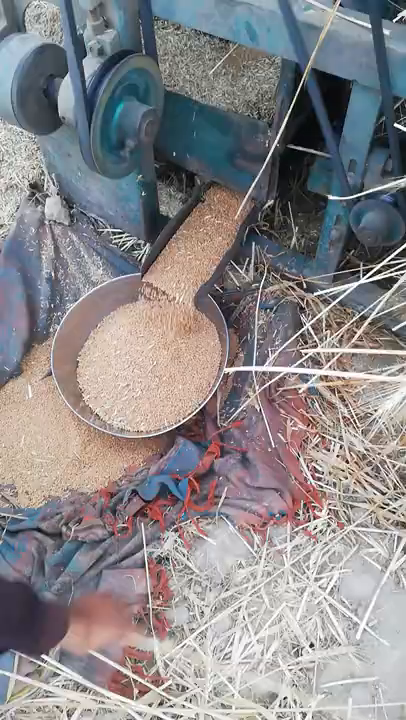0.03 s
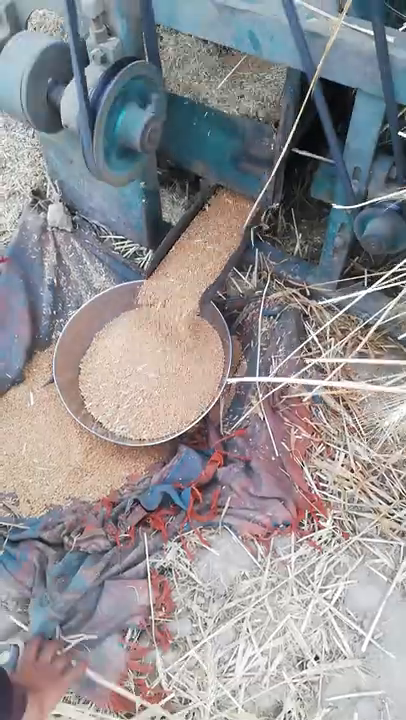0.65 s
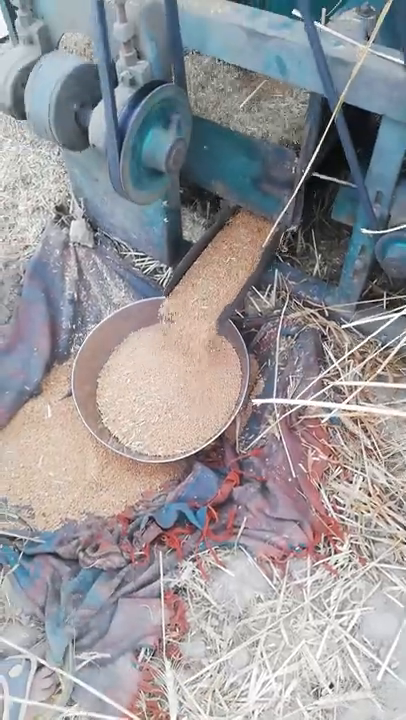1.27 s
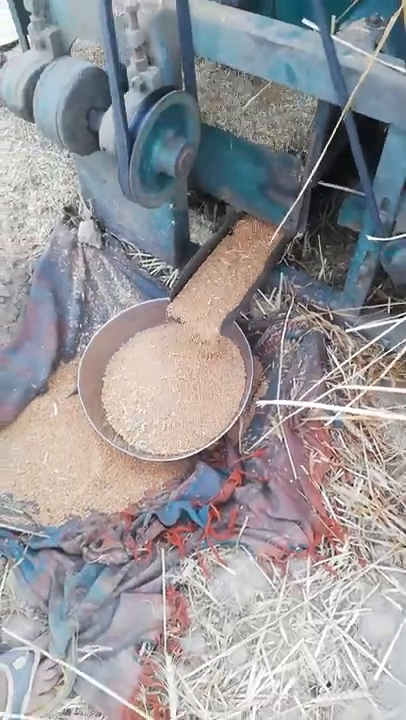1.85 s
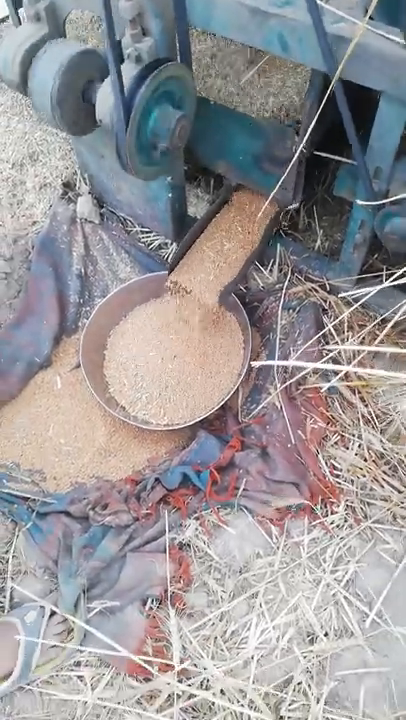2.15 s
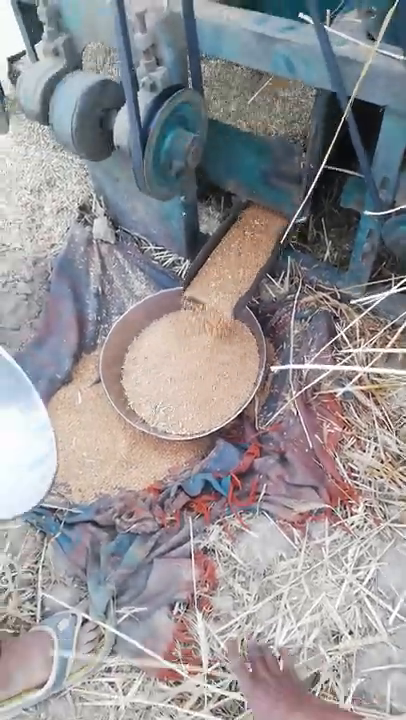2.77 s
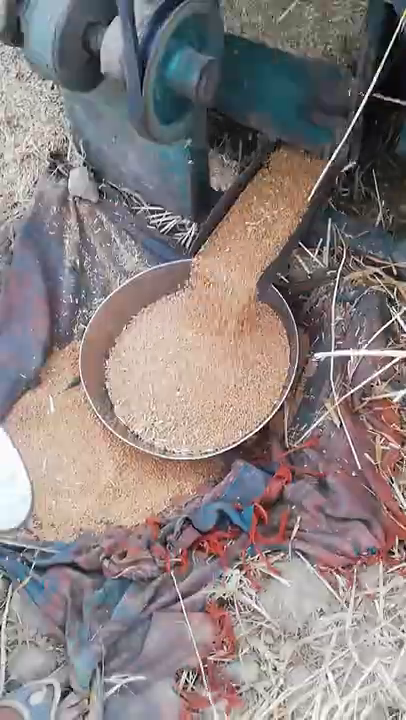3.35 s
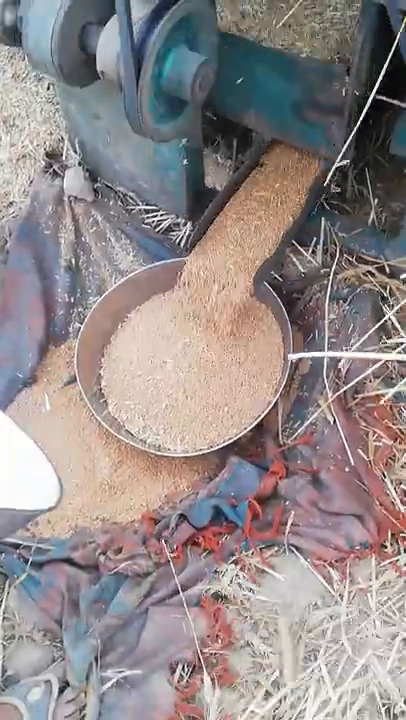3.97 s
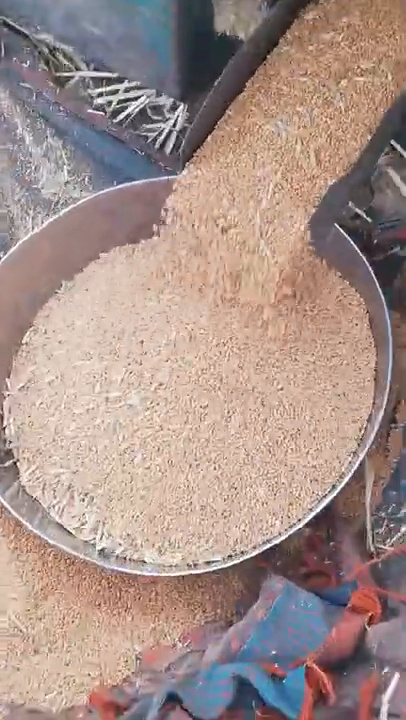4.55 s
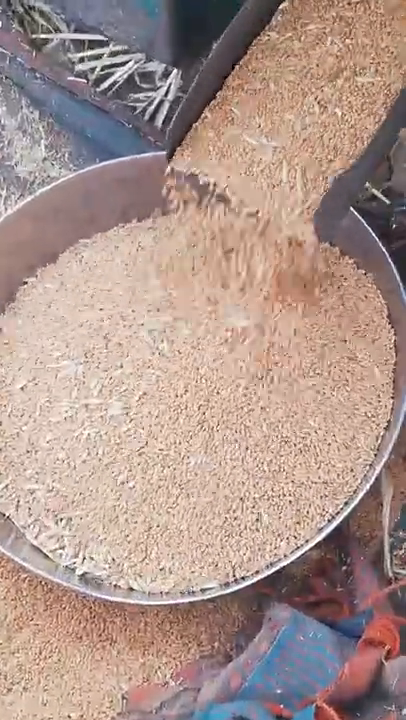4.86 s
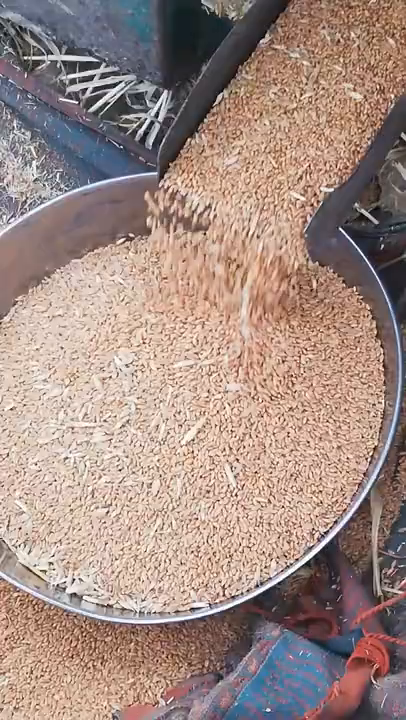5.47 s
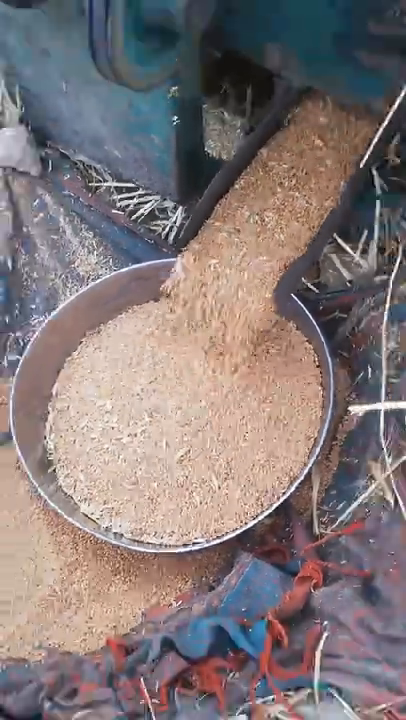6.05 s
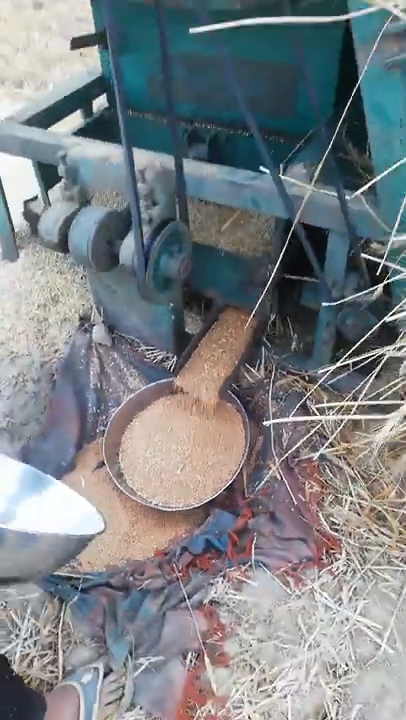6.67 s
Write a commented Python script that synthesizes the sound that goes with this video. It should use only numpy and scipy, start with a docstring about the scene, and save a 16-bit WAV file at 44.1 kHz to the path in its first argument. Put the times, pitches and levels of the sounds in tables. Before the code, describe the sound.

Close by, an engine-driven thresher drones and roars, with rattling metal, short squeaks and the hiss of pouring grain.

```python
"""Outdoors, close beside the chute of a belt-driven threshing machine, on a hand-held stereo microphone.
Engine and threshing drum turn at nearly the same speed, so their hums beat against each other.
The steel housing rumbles, beaters roar through straw and loose guards rattle. Wheat slides down
into a basin, pattering on sheet metal, and the hangers of the shaking sieve chirp on every stroke."""
import sys
import numpy as np
from scipy import signal
from scipy.fft import rfft, irfft, next_fast_len
from scipy.io import wavfile
from scipy.ndimage import uniform_filter1d, map_coordinates

SR = 44100
rng = np.random.default_rng(int(sys.argv[2]) if len(sys.argv) > 2 else 0)


def master_out(mix):
    """Clip the mix to full scale and print it as 16-bit PCM to the path in sys.argv[1]."""
    frames = np.transpose(np.atleast_2d(mix))
    ceiling = np.clip(frames, -1, 1)
    pcm = np.round(ceiling * 32767).astype(np.int16)
    wavfile.write(sys.argv[1], SR, pcm)


N = 296352
TIME = np.arange(N) / SR
FFT_SIZE = next_fast_len(N + SR // 4, real=True)
BINS_HZ = np.arange(FFT_SIZE // 2 + 1) * SR / FFT_SIZE


def from_db(db):
    """Decibels to gain."""
    return 10 ** (np.asarray(db) / 20)


def unit_rms(x):
    """Scale to rms 1."""
    return x / np.sqrt(np.mean(x ** 2) + 1e-20)


def over_time(rows, column=1):
    """One column of a timed table, at every sample."""
    columns = np.transpose(rows)
    return np.interp(TIME, columns[0], columns[column])


def over_hz(points):
    """A table at every frequency, joined on a log axis."""
    hz, value = np.transpose(points)
    return np.interp(np.log(BINS_HZ + 1), np.log(hz), value)


def noise():
    """Two unrelated white noises."""
    return rng.standard_normal((2, N))


def drift(rate_hz):
    """A smooth random wander with a spread of 1."""
    hop, settle = 40, 2000
    pole = np.exp(-2 * np.pi * rate_hz * hop / SR)
    white = rng.standard_normal(N // hop + settle + 2)
    slow = signal.lfilter([1], [1, -2 * pole, pole * pole], white)[settle:]
    return np.interp(np.arange(N) / hop, np.arange(len(slow)), unit_rms(slow))


def coloured(x, spectrum):
    """Minimum-phase filter with the given spectrum: nothing rings ahead of a hit."""
    cepstrum = irfft(np.log(from_db(over_hz(spectrum))), FFT_SIZE)
    cepstrum[1:FFT_SIZE // 2] *= 2
    cepstrum[FFT_SIZE // 2 + 1:] = 0
    return irfft(rfft(x, FFT_SIZE) * np.exp(rfft(cepstrum)), FFT_SIZE)[..., :N]


def resonance(x, hz, width_hz):
    """One resonance with gain 1 at its peak."""
    r = np.exp(-np.pi * width_hz / SR)
    feedback = [1, -2 * r * np.cos(2 * np.pi * hz / SR), r * r]
    return signal.lfilter(np.array([1, 0, -1]) * (1 - r * r) / 2, feedback, x)


def with_modes(x, modes):
    """A sound plus the resonances it excites."""
    return x + sum(from_db(db) * resonance(x, hz, width_hz) for hz, width_hz, db in modes)


def impacts(per_s, spread_db, t60_s, crack_db):
    """Random blows, each a sharp crack and a burst of noise that dies away."""
    blows = (rng.random(N) < per_s / SR) * from_db(spread_db * np.minimum(rng.exponential(1, N), 3))
    energy = signal.lfilter([1], [1, -from_db(-120 / (t60_s * SR))], blows ** 2 + 1e-18)
    tails = unit_rms(np.sqrt(energy) * noise())
    cracks = unit_rms(blows * rng.choice([-1, 1], (2, N)))
    return tails + from_db(crack_db) * cracks


def stereo_mic(pair):
    """Two unrelated signals become left and right: alike in the bass, earlier on the left."""
    # likeness of the two microphone ports: frequency_hz, coherence
    likeness = [(60, .997), (110, .99), (200, .98), (270, .93), (340, .7), (450, .95), (900, .8),
                (1250, .46), (1700, .53), (3000, .3), (8000, .2), (15000, .08)]
    # tone difference between the ports: frequency_hz, left_minus_right_db
    balance = [(170, 1.5), (280, -7.5), (340, -12), (400, 2), (480, 3.5), (620, 3.5), (820, 0.5),
               (1130, -2.5), (1350, -2.5), (1800, 1), (2300, 3.5), (3600, -1.5), (6000, 0), (8000, 10.5),
               (9000, 11.5), (15000, 4.5)]
    # phase between the ports: frequency_hz, left_lead_rad
    lead = [(60, 0), (100, .1), (200, .5), (300, .65), (400, 2.2), (1100, 2.5), (1460, 4.3), (2150, 6.8),
            (2900, 10.5), (5080, 19.3), (8270, 29.7), (14600, 51)]
    mid, side = rfft(pair, FFT_SIZE)
    alike, sign = over_hz(likeness), np.array([[1], [-1]])
    ports = np.sqrt(1 + alike) * mid + sign * np.sqrt(1 - alike) * side
    gain = from_db(sign * over_hz(balance) / 2)
    gain /= np.sqrt(np.sum(gain ** 2, axis=0))
    return irfft(ports * gain * np.exp(.5j * sign * over_hz(lead)), FFT_SIZE)[:, :N]


def hand_held(ports):
    """The microphone turns in the hand, shifting the delay and balance between its ports."""
    # aim of the microphone: time_s, right_lag_samples, left_minus_right_db
    pose = [(.5, 0.5, 2.4), (2.2, 0.5, 1.7), (2.8, -0.6, 1), (5.2, -0.83, 0.9), (6.5, -0.98, 0)]
    lag, balance_db = over_time(pose, 1), over_time(pose, 2)
    right = map_coordinates(ports[1], [np.arange(N) - lag], order=3, mode="nearest")
    return np.array([ports[0], right]) * from_db([balance_db / 2, -balance_db / 2])


def housing_rumble(engine_turns, throb_db=-1.2, firing_db=1.0):
    """The housing is shaken once a turn and at each of the two firings."""
    # colour of the shaking steel: frequency_hz, gain_db
    colour = [(20, -41), (35, -10), (55, -5), (90, -4), (130, -3), (170, -0.5), (280, -4), (340, -13),
              (450, -41), (900, -46)]
    # strength of the shaking: time_s, level_db
    shake = [(.5, -24.5), (1.8, -24), (4.6, -22.5), (6.6, -21.5)]
    angle = 2 * np.pi * engine_turns
    throb = from_db(throb_db * np.cos(angle) + firing_db * np.cos(2 * angle))
    return from_db(over_time(shake)) * unit_rms(coloured(noise() * throb, colour))


def guard_rattle(knocks_per_s=12, width_hz=34, tilt_db_per_octave=.6, parts=36):
    """Loose guards and bolts knock at random, each ringing briefly at its own pitch."""
    out = 0
    for hz in np.geomspace(800, 9000, parts) * rng.uniform(.96, 1.04, parts):
        knocks = (rng.random(N) < knocks_per_s / SR) * rng.uniform(-.98, 1, (2, N)) + 1e-18
        out += from_db(tilt_db_per_octave * np.log2(hz)) * unit_rms(resonance(knocks, hz, width_hz))
    return unit_rms(out)


def kernel_ticks(t60_s=.047):
    """Single kernels flung hard against the steel, each a bright tick."""
    # hard hits: start_s, relative_level_db
    hits = [(1.1364, -18), (1.905, -20), (1.94, -30), (2.5496, -22), (2.9343, -18), (4.7764, -21),
            (4.8494, -21), (4.9008, -18), (5.2004, -22), (5.582, -19), (6.003, -20)]
    # colour of the struck steel: frequency_hz, gain_db
    colour = [(800, -10), (4000, -7), (8700, 7), (11000, -6), (16000, -14)]
    t, out = np.arange(SR // 10) / SR, np.zeros((2, N))
    for start_s, db in hits:
        at = int(start_s * SR)
        out[:, at:at + len(t)] += from_db(db - 60 * t / t60_s) * rng.standard_normal((2, len(t)))
    return coloured(out, colour)


def sieve_slips(strokes, jitter_s=.004, spread_octaves=.018, spread_db=1.5):
    """Each pivot slips at its own place in every sieve stroke, never twice alike."""
    # sieve pivots: stroke_fraction, pitch_hz, level_db, scrape_db, swell_s, binding_share
    pivots = [(.11, 5256, -25, -5, .013, 0.95), (.3, 7600, -30.5, 8, 0.018, 0),
              (0.573, 4587, -26.5, 0, 0.0096, 0.12), (0.609, 3100, -31.5, 14.5, 0.012, 0),
              (.67, 2364, -29, 8, 0.022, 0)]
    # how hard the main hanger binds: time_s, gain_db
    binding = [(.6, -2), (.8, 5), (1.2, -5), (1.9, -0.5), (2.2, 5), (2.6, -1), (3.0, 1), (3.85, -9),
               (4.3, 3.5), (5.15, 5), (5.55, 0), (6.15, 1.5), (6.5, -15)]
    slips = []
    for stroke in range(int(strokes[-1]) + 1):
        for place, hz, db, scrape_db, swell_s, share in pivots:
            late, sharp, hard = rng.standard_normal(3)
            if strokes[0] < stroke + place < strokes[-1]:
                peak_s = np.interp(stroke + place, strokes, TIME) + jitter_s * late
                level_db = db + share * np.interp(peak_s, *np.transpose(binding)) + spread_db * hard
                slips.append((peak_s, hz * 2 ** (spread_octaves * sharp), level_db, scrape_db, swell_s))
    return slips


def loud_sieve_squeals(scrape_db=-5, swell_s=.0084):
    """Now and then a sieve pivot squeals louder than usual."""
    # loud squeals of the sieve pivots: peak_s, pitch_hz, level_db
    squeals = [(0.648, 7800, -20.5), (0.71, 2400, -24), (1.311, 4410, -24), (1.557, 6330, -23),
               (2.244, 8070, -20), (3.105, 4700, -23), (3.326, 3340, -20), (3.693, 6900, -17),
               (3.901, 6870, -19), (4.114, 7600, -18)]
    return [(peak_s, hz, db, scrape_db, swell_s) for peak_s, hz, db in squeals]


def chirps(slips, tone_width_hz=65, scrape_width_hz=920, rise_per_s=1.11, stutter_db=2.5):
    """A pivot sticks and slips: a short, stuttering, rising tone inside a wider scrape."""
    t = np.arange(-SR // 20, SR // 20) / SR
    out = np.zeros((2, N + 2 * len(t)))
    for peak_s, hz, db, scrape_db, swell_s in slips:
        swell = np.exp(-.5 * (t / swell_s) ** 2)
        phase_steps, friction = rng.standard_normal((2, 2, len(t)))
        wander = np.cumsum(phase_steps, axis=1) * np.sqrt(2 * np.pi * tone_width_hz / SR)
        tone = np.sqrt(2) * np.sin(2 * np.pi * hz * (t + rise_per_s * t * t / 2) + wander)
        scrape = unit_rms(resonance(resonance(friction, hz, scrape_width_hz), hz, scrape_width_hz))
        at = int(peak_s * SR) + len(t) // 2
        out[:, at:at + len(t)] += from_db(db) * swell * unit_rms(tone + from_db(scrape_db) * scrape)
    stutter = unit_rms(from_db(stutter_db * drift(60)))
    return out[:, len(t):len(t) + N] * stutter


def grain_patter(strokes, lump_hz, lump_db=.88, toss_db=1.9, clump_db=2.5, slide_db=3):
    """Kernels hit steel in clumps, tossed once a sieve stroke, over the hiss of sliding grain."""
    # grain coming down the chute: time_s, relative_level_db
    flow = [(0.47, -29), (1.5, -28.5), (1.78, -30.5), (1.94, -27), (2.38, -29), (2.71, -26), (2.86, -29.5),
            (3.15, -26.5), (3.34, -29.1), (3.94, -27), (4.5, -28.5), (4.87, -26.5), (4.99, -30), (5.3, -28),
            (5.42, -26.5), (5.79, -29), (6.18, -28), (6.71, -30.5)]
    # colour of wheat on sheet metal: frequency_hz, gain_db
    colour = [(700, -11), (2000, -6), (3600, -3), (5000, -2), (6300, -1), (7200, -0.5), (8000, 2),
              (9000, -2), (10000, -8.5), (11000, -13.5), (13000, -17), (16000, -23)]
    level = from_db(over_time(flow) + lump_db * drift(lump_hz))
    toss = np.cos(2 * np.pi * (strokes - .45))
    hits_per_s = 440 * from_db(toss_db * toss + clump_db * drift(24))
    hits = impacts(hits_per_s, spread_db=2, t60_s=.031, crack_db=-27)
    return level * unit_rms(coloured(hits + from_db(slide_db) * noise(), colour))


def shaft_hum(turns, orders, waver_rad, flutter_db):
    """Tones at multiples of a shaft's speed; the higher ones waver more in phase and level."""
    out = 0
    for multiple, level_db in orders:
        phase = 2 * np.pi * multiple * turns + waver_rad * multiple * drift(5)
        level = from_db(level_db + flutter_db * multiple * drift(6.5))
        out += level * np.sqrt(2) * np.cos(phase)
    return out


def drive_hum(speed, engine_turns, drum_turns, strain_s=.34):
    """Engine and drum hum together, louder at speed and while the engine labours and slows."""
    # engine tones: speed_multiple, relative_level_db
    engine_orders = [(1, -36.5), (1.5, -37), (2, -22.6), (3, -44), (4, -36.5), (5, -42), (6, -37), (7, -37),
                     (8, -43)]
    # drum tones: speed_multiple, relative_level_db
    drum_orders = [(1, -37.5), (2, -33), (3, -37), (4, -43)]
    # air spaces that boom as a tone passes through their pitch: pitch_hz, width_hz, gain_db
    cavities = [(159.2, 3.4, -3), (215.4, 4, 5), (238, 3.9, -3.5), (290.7, 3.1, 12)]
    engine = shaft_hum(engine_turns, engine_orders, waver_rad=.038, flutter_db=.38)
    drum = shaft_hum(drum_turns, drum_orders, waver_rad=.063, flutter_db=.93)
    slowing = uniform_filter1d(-np.gradient(speed) * SR, int(strain_s * SR))
    effort_db = .3 * (speed - speed.mean()) + .5 * slowing
    return from_db(effort_db) * with_modes(engine + drum, cavities)


def threshing_roar(drum_turns, lump_hz, lump_db=.5, beater_db=-.7, air_db=1.5):
    """Beaters tear through straw in a rush of fan air; the panels of the housing ring along."""
    # straw passing through the drum: time_s, relative_level_db
    feed = [(0.47, -20.5), (1.78, -21.0), (2.06, -20), (2.19, -22), (2.34, -18.5), (2.94, -21), (3.06, -19),
            (3.38, -20.5), (4.5, -19.1), (5.18, -20), (6.42, -19.5), (6.71, -20.5)]
    # colour inside the drum: frequency_hz, gain_db
    colour = [(180, -23.5), (300, -6), (400, -3), (500, -3.5), (620, -1), (820, 0), (1130, -3.5),
              (1800, -7), (2300, -13), (2800, -13), (3600, -19.5), (6000, -22.5), (10000, -33),
              (16000, -60)]
    # housing panels: pitch_hz, width_hz, gain_db
    panels = [(445, 14.6, 2.5), (516, 89, -3.5), (728, 25, 0.5), (833, 40, -15), (914, 39, -5.5),
              (1020, 8.3, -37), (1275, 210, -5), (1700, 58, -27), (2050, 13, -24), (2456, 67, -3.5),
              (2610, 35, -7), (3340, 21, -18)]
    level = from_db(over_time(feed) + lump_db * drift(lump_hz))
    beaters = from_db(beater_db * np.cos(6 * np.pi * drum_turns))  # three pass in each turn
    straw = beaters * impacts(per_s=1000, spread_db=0, t60_s=.015, crack_db=-9)
    inside = coloured(straw + from_db(air_db) * noise(), colour)
    return level * unit_rms(with_modes(inside, panels))


def scene():
    """The whole machine from beside the chute; the engine drives both drum and sieve."""
    # engine speed: time_s, turns_per_s
    engine_speed = [(.44, 38.1), (.61, 38.14), (1, 38.75), (1.51, 39.53), (2.01, 40.15), (2.58, 39.8),
                    (3.04, 38.45), (3.35, 37.2), (3.78, 37.3), (4.34, 37.95), (4.9, 38.45), (5.51, 37.5),
                    (6.07, 36.15), (6.72, 35.8)]
    belt_slip, belt_lag_s, drum_lead_turns, turns_per_stroke = .02333, .0412, 2.228, 7.9195
    lump_hz = 9.1  # the crop arrives in irregular lumps
    speed = over_time(engine_speed)
    engine_turns = np.cumsum(speed) / SR
    # the belt creeps, so the two hums swell and cancel as the shafts drift in and out of step
    drum_turns = (1 - belt_slip) * engine_turns - belt_lag_s * speed + drum_lead_turns
    strokes = engine_turns / turns_per_stroke + .208  # the sieve starts partway through a stroke
    hum = drive_hum(speed, engine_turns, drum_turns)
    rumble = stereo_mic(housing_rumble(engine_turns))
    roar = from_db(2.5) * threshing_roar(drum_turns, lump_hz)
    grain = from_db(6.5) * grain_patter(strokes, lump_hz)
    rattle = from_db(-28.5) * guard_rattle()
    ticks = from_db(6) * kernel_ticks()
    sieve = chirps(sieve_slips(strokes) + loud_sieve_squeals())
    return hum + rumble + hand_held(stereo_mic(roar + grain + rattle + ticks + sieve))


def record(dry):
    """The sound opens abruptly after a short silence; the highest treble is cut."""
    start_s, fade_s, cutoff_hz = .441, .002, 15900
    opened = dry * np.clip((TIME - start_s) / fade_s, 0, 1)
    return signal.sosfilt(signal.ellip(12, .1, 90, cutoff_hz, fs=SR, output="sos"), opened)


dry = scene()
out = record(dry)
master_out(out)
```